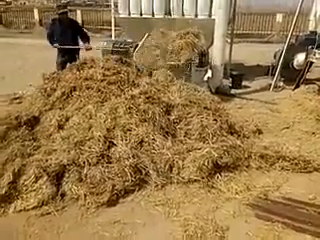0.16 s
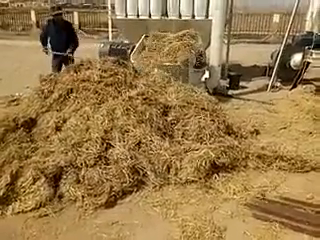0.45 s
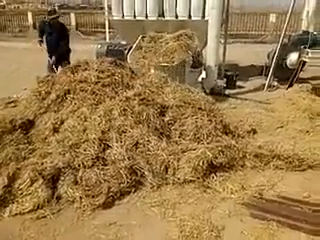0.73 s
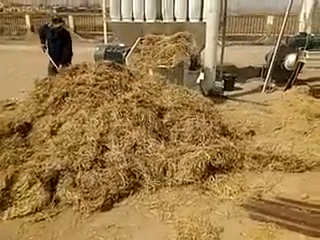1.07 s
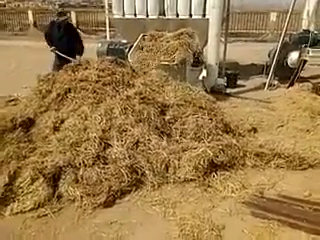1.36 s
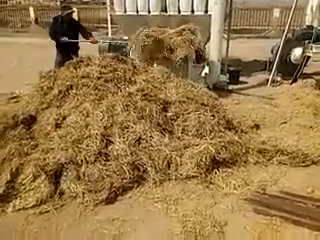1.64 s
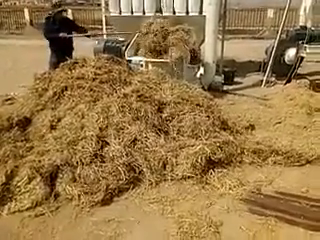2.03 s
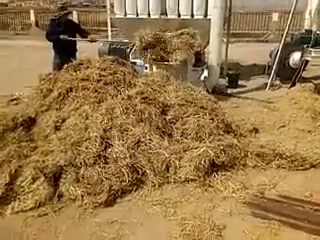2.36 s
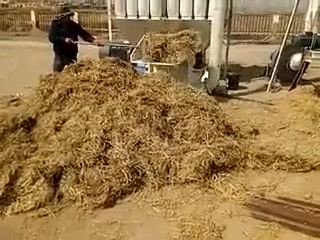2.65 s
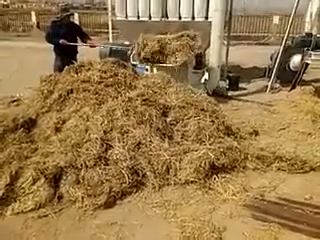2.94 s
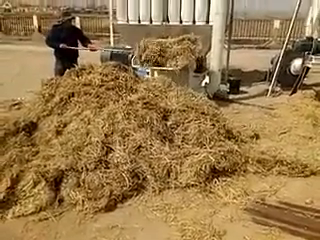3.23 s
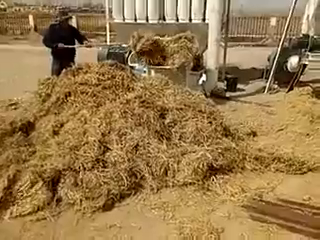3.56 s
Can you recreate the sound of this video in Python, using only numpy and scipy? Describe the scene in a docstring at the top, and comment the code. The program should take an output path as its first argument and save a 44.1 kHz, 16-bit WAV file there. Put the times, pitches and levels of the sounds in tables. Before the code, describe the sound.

A hammer mill roars without pause as it shreds straw in an open yard: rough chip noise, rotor hum, whine, throbbing casing booms and metallic rattle, with low wind thumps on a slightly dull microphone.

```python
"""A hammer mill shreds straw in an open yard, all through: rotor tones, a motor whine, chip roar, rattle, ringing.
First, wind thumps the microphone: shaped low noise, and short swells of narrow noise on top.
For the first two seconds the casing drum booms in its strongest throbs, a wavering narrow band of noise.
Just after 2 s a hard bit ticks on the screen, two short sines; the throbs then come softer.
From about 3 s the wind thumps return, and the shaft hum swells before the end."""
import sys
import numpy as np
from scipy import signal
from scipy.fft import rfft, irfft, next_fast_len
from scipy.io import wavfile
from scipy.ndimage import uniform_filter1d, map_coordinates

SR = 44100
rng = np.random.default_rng(int(sys.argv[2]) if len(sys.argv) > 2 else 0)


def makeup_ratio(level_db):
    """Linear amplitude ratio for a level in decibels (20 dB per factor of ten)."""
    decades = np.asarray(level_db, float) / 20
    return 10 ** decades


def materialize(psi):
    """Save the field psi as 16-bit PCM at rate SR to the path in sys.argv[1].

    A 1-D psi becomes a single channel; in a 2-D psi each row is a channel.
    """
    bounded = np.clip(np.atleast_2d(psi).T, -1, 1)
    quanta = np.round(bounded * 32767).astype(np.int16)
    wavfile.write(sys.argv[1], SR, quanta)


N = 162729  # samples


def unit(x):
    """Scale to rms 1."""
    return x / np.sqrt(np.mean(x ** 2) + 1e-20)


def along(points, hz):
    """Read (f/Hz, value) points on a log frequency axis."""
    f, v = np.transpose(points)
    return np.interp(np.log(hz + 1), np.log(f + 1), v)


def curves(rows):
    """One value per sample for each column after the time."""
    s, *cols = np.transpose(rows)
    return [np.interp(np.arange(N) / SR, s, c) for c in cols]


def wobble(rate):
    """A smooth random curve, rate knots a second."""
    knots = rng.standard_normal(int(N * rate / SR) + 4)
    return map_coordinates(knots, [np.arange(N) * rate / SR])


def filtered(x, response):
    """x with its spectrum multiplied by a response of frequency."""
    m = next_fast_len(N + 8192)
    return irfft(rfft(x, m) * response(np.fft.rfftfreq(m, 1 / SR)), m)[..., :N]


def patchy(patchy_db, size):
    """White noise with patches of random gain, size in (frequency bins, frames)."""
    z = signal.stft(rng.standard_normal(N), nperseg=512)[2]
    field = rng.standard_normal(z.shape)
    field = uniform_filter1d(field, size[0], 0)
    field = uniform_filter1d(field, size[1], 1)
    return unit(signal.istft(z * makeup_ratio(patchy_db * unit(field)), nperseg=512)[1][:N])


def sway(width_hz, even=0.32):
    """Complex low-passed noise, its size partly evened: times a carrier it makes a narrow band."""
    a, b = filtered(rng.standard_normal((2, N)), lambda f: 1 / (1 + (2 * f / width_hz) ** 2))
    z = (a + 1j * b) / (np.hypot(a, b) + 1e-9) ** even
    return z / np.sqrt(np.mean(np.abs(z) ** 2) / 2)  # real part has rms 1


def tone(phase, drift):
    """A sine of rms 1 with a drifting phase (drift in radians)."""
    return np.sqrt(2) * np.sin(phase + drift * wobble(14) + rng.uniform(0, 2 * np.pi))


def swells(rows, width_hz, even):
    """Narrow bands of noise that swell and fade, cut from one shared noise at different places."""
    t, shared, out = np.arange(N) / SR, sway(width_hz, even), np.zeros(N)
    for k, (s, length, hz, db) in enumerate(rows):
        swell = np.exp(-(2 * (t - s) / length) ** 2)
        band = np.real(np.roll(shared, 6007 * k) * np.exp(2j * np.pi * hz * t))
        out += makeup_ratio(db) * swell * band
    return out


# The row-passing tone, six rows of hammers per turn: t/s, level/dB rms
ROW_PASSING = [(0, -41), (.3, -31.5), (.7, -31), (1.0, -36.5), (1.42, -34), (1.64, -41), (1.78, -31.5),
               (1.95, -40.5), (2.2, -32), (2.7, -38), (2.92, -30), (3.1, -39.5), (3.19, -28.5), (3.32, -35),
               (3.69, -31.5)]
# Twice the row-passing rate, flaring and sinking: t/s, peak level of the line/dB
TWICE_PASSING = [(0.0, -46), (.45, -41), (.62, -44), (1.0, -39), (1.3, -44), (1.48, -39), (1.63, -45),
                 (1.82, -40), (1.87, -62), (1.98, -36), (2.28, -43), (2.33, -51), (3.69, -49)]
# Three times the row-passing rate: t/s, peak level of the line/dB
THRICE_PASSING = [(0.0, -61), (0.09, -35), (0.25, -47), (0.29, -37.5), (0.6, -54), (0.71, -28.5),
                  (0.82, -44.5), (0.88, -28.5), (1.0, -49), (1.3, -32.5), (1.38, -58), (1.49, -32),
                  (1.58, -37.5), (1.76, -45), (1.84, -36), (1.96, -42), (2.02, -30), (2.1, -46),
                  (3.13, -39.5), (3.23, -51), (3.37, -28), (3.56, -45), (3.69, -41)]
# Hum of the shaft at one cycle a turn: t/s, level/dB rms
SHAFT_HUM = [(0.0, -50), (0.19, -49), (0.98, -39), (2.14, -58), (3.47, -33), (3.69, -48)]
# Rotor orders that hold their level: multiple of the turning rate, level/dB rms, waver/dB
STEADY_ORDERS = [(3, -43, 1.5), (42, -45.5, 2.5)]
# Motor whine: f/Hz, level/dB rms
MOTOR_WHINE = [(1736, -50), (2347, -45.5), (3129, -73)]


def rotor():
    """The hammer rotor sings at multiples of its turning rate; the motor whines at fixed pitches."""
    t = np.arange(N) / SR
    turn = 2 * np.pi * 49.93 * t  # turns at 49.93 Hz

    def rough(order):
        """A line in a skirt of noise 28 Hz wide."""
        return np.real((1 + sway(28)) * np.exp(1j * order * turn))

    out = makeup_ratio(curves(ROW_PASSING)[0] + 2.0 * wobble(14)) * tone(6 * turn, drift=1.05)
    out += makeup_ratio(curves(TWICE_PASSING)[0] + 1.3 * wobble(22.24)) * rough(12)
    out += makeup_ratio(curves(THRICE_PASSING)[0] + 0.87 * wobble(22.05)) * rough(18)
    out += makeup_ratio(curves(SHAFT_HUM)[0]) * tone(turn, drift=0.43)
    for order, db, waver_db in STEADY_ORDERS:
        out += makeup_ratio(db + waver_db * wobble(12)) * tone(order * turn, drift=0.66)
    for hz, db in MOTOR_WHINE:
        out += makeup_ratio(db + 0.61 * wobble(0.86)) * tone(2 * np.pi * hz * t, drift=0.32)
    return out


# Shredding as it reaches the microphone: t/s, rms level of its 1000-2300 Hz band/dB
SHREDDING_LEVEL = [(0.0, -31.5), (2.0, -32), (3.69, -32)]
# Colour the casing gives the roar: f/Hz, relative level/dB
CASING_COLOUR = [(120, -120), (170, -0.5), (300, 9), (400, 1.5), (480, -1.5), (700, -3), (820, 3),
                 (1000, -0.5), (1300, -1.5), (1600, -6), (1830, 3), (2150, 2), (2280, -6.5), (2600, 3.5),
                 (3000, -2), (3600, -3), (4200, -6), (4800, -3.5), (5100, -1), (5350, -0.5), (6050, -1.5),
                 (6230, -2.5), (6400, -6.5), (6800, -13), (7300, -16.5), (7700, -27.5), (8200, -53),
                 (9000, -120)]


def shredding():
    """Air rush and a hail of straw chips, single clicks of random size, through the casing's colour."""
    chips_per_s, chip_spread_db, chip_share = 9000, 4, 0.21  # share of the power
    count = int(chips_per_s * N / SR)
    places = (rng.uniform(size=count) * N).astype(int)
    sizes = makeup_ratio(chip_spread_db * rng.standard_normal(count)) * np.sign(rng.standard_normal(count))
    chips = unit(np.bincount(places, sizes, N))
    rush = patchy(patchy_db=1.9, size=(8, 6))
    drive = np.sqrt(chip_share) * chips + np.sqrt(1 - chip_share) * rush
    roar = filtered(drive, lambda f: makeup_ratio(along(CASING_COLOUR, f)))
    band = unit(filtered(roar, lambda f: (f > 1000) & (f < 2300)))
    scale = np.dot(band, band) / np.dot(band, roar)  # brings that band of the roar to rms 1
    return scale * roar * makeup_ratio(curves(SHREDDING_LEVEL)[0] + 0.73 * wobble(8.72))


# Throbs of the casing drum: t/s, level/dB rms, centre f/Hz
DRUM_THROBS = [(0.0, -29.5, 255), (0.11, -25.5, 250), (0.55, -34, 250), (0.78, -20, 250),
               (0.87, -32.5, 225), (1.03, -17, 240), (1.12, -23.5, 270), (1.18, -34.5, 260),
               (1.42, -18.5, 235), (1.58, -33.5, 250), (1.65, -24, 230), (1.69, -32.5, 240),
               (1.83, -19, 240), (1.92, -28, 225), (2.12, -28, 260), (2.5, -28, 260), (2.64, -32.5, 250),
               (2.79, -22, 238), (3.02, -27.5, 250), (3.21, -20, 265), (3.36, -33.5, 255),
               (3.61, -19.5, 240), (3.69, -24, 230)]


def drum():
    """The casing booms in throbs, a narrow growl whose centre wavers."""
    db, hz = curves(DRUM_THROBS)
    phase = 2 * np.pi * np.cumsum(hz + 8 * wobble(20)) / SR
    return makeup_ratio(db) * np.real(sway(57.7, even=0.29) * np.exp(1j * phase))


# High ringing swells of hammers and screen, and clumps rattling down the chute near 2580 Hz:
# centre t/s, length/s, f/Hz, crest level/dB rms
RING_AND_CLUMP_SWELLS = [(.1, 0.33, 5080, -32.5), (.33, 0.18, 5760, -29.5), (.35, 0.11, 5490, -28),
                         (.5, 0.1, 5210, -31.5), (.67, 0.11, 5490, -31), (.88, 0.092, 5440, -32.5),
                         (1.03, 0.19, 5180, -31.5), (1.07, 0.068, 5870, -32), (1.55, 0.63, 5730, -32),
                         (1.77, 0.14, 5720, -29), (2.36, 0.053, 5730, -32), (2.38, 0.11, 5120, -35),
                         (2.72, 0.13, 5420, -29), (2.72, 0.068, 5105, -33), (2.93, 0.15, 5000, -28.5),
                         (3.03, 0.1, 6030, -29), (3.1, 0.18, 5340, -36), (3.48, 0.076, 5030, -27.5),
                         (3.62, 0.11, 4990, -34.5), (2.09, 0.09, 2584, -25.5), (2.28, 0.11, 2580, -34),
                         (3.0, 0.12, 2580, -29), (1.95, 0.073, 2100, -29)]
# The metal of hammers and screen ringing faintly all the time: f/Hz, width/Hz, level/dB rms
FAINT_RINGING = [(5120, 320, -38.5), (5730, 59, -39)]
# A hard bit strikes the screen: t/s, level before the rise and the partials/dB
SCREEN_TICKS = [(2.0414, -6)]
# What the struck screen rings with: f/Hz, relative level/dB
SCREEN_PARTIALS = [(4900, 0), (4100, -3)]


def rings_and_clumps():
    """Narrow noise swells for ringing metal and chute clumps, a faint ringing bed, a fast-dying tick."""
    t = np.arange(N) / SR
    out = swells(RING_AND_CLUMP_SWELLS, width_hz=85, even=0.1)
    for hz, width_hz, db in FAINT_RINGING:
        band = np.real(sway(width_hz) * np.exp(2j * np.pi * hz * t))
        out += makeup_ratio(db + 1.4 * wobble(6.46)) * band
    t60_s, rise_s = 0.0045, 0.0002
    for s, db in SCREEN_TICKS:
        u = np.maximum(t - s, 0)
        envelope = makeup_ratio(db - 60 * u / t60_s) * (1 - np.exp(-u / rise_s))
        out += envelope * sum(makeup_ratio(level) * np.sin(2 * np.pi * hz * u) for hz, level in SCREEN_PARTIALS)
    return out


# Rattle in the chute: t/s, level/dB rms, centre f/Hz
CHUTE_RATTLE = [(0.0, -37, 2573), (0.6, -31.5, 2760), (0.86, -27, 2690), (1.1, -31, 2690),
                (1.97, -35.5, 2676), (2.08, -30, 2585), (2.15, -38, 2650), (2.25, -29.5, 2650),
                (2.37, -36.5, 2650), (2.49, -30, 2660), (2.58, -40, 2690), (2.97, -31.5, 2646),
                (3.35, -32.5, 2700), (3.45, -43, 2698), (3.69, -32.5, 2676)]


def chute():
    """A broad rattle whose centre wanders, noise around a gliding carrier."""
    db, hz = curves(CHUTE_RATTLE)
    carrier = np.exp(2j * np.pi * np.cumsum(hz) / SR)
    return makeup_ratio(db + 2.4 * wobble(24.96)) * np.real(sway(410) * carrier)


# Wind thumps on the microphone: centre t/s, length/s, f/Hz, crest level/dB rms
WIND_THUMPS = [(.26, 0.068, 105, -27), (.27, 0.13, 148.4, -26.5), (.71, 0.042, 98, -25.5),
               (3.15, 0.038, 95, -29.5), (3.22, 0.1, 149.4, -27), (3.2, 0.064, 363, -35.5),
               (3.44, 0.066, 92, -24.5)]


def wind_thumps():
    """Wind thumps on the microphone, short low swells of narrow noise."""
    return swells(WIND_THUMPS, width_hz=19, even=0.49)


# Wind rumble on the microphone: t/s, level/dB rms
WIND_LEVEL = [(0.0, -50), (0.26, -36.5), (0.64, -37), (0.87, -41), (0.99, -30.5), (1.19, -42),
              (1.28, -31.5), (1.35, -43), (1.48, -30.5), (1.52, -40), (2.9, -40), (3.13, -30.5),
              (3.69, -30)]
# Colour of the wind rumble: f/Hz, relative level/dB
WIND_COLOUR = [(12, -40), (22, -6), (38, -12), (62, -2.5), (97, 1), (125, -5), (155, -1), (190, -5),
               (300, -24), (450, -21), (600, -120)]


def wind():
    """Lumpy low rumble on the microphone, coloured noise with a wavering level."""
    noise = filtered(rng.standard_normal(N), lambda f: makeup_ratio(along(WIND_COLOUR, f)))
    lumps = makeup_ratio(2.4 * wobble(18)) * noise
    return makeup_ratio(curves(WIND_LEVEL)[0]) * unit(lumps)


# Faint top hiss: t/s, level/dB rms
HISS_LEVEL = [(0.0, -60.5), (2.59, -66), (2.96, -60), (3.65, -63)]


def top_hiss():
    """Patchy noise from about 7450 Hz up to 13950 Hz, above the microphone's range."""
    noise = patchy(patchy_db=5.0, size=(3, 5))
    hiss = unit(filtered(noise, lambda f: (f < 13950) / (1 + (7450 / (f + 1)) ** 24)))
    return makeup_ratio(curves(HISS_LEVEL)[0]) * hiss


def scene():
    """Everything in the yard, one channel."""
    mill = rotor() + shredding() + drum() + rings_and_clumps() + chute()
    return (mill + wind_thumps() + wind())[None]


def low_pass(x):
    """Removes everything above the highest recorded frequency."""
    return signal.sosfilt(signal.butter(12, 13950, fs=SR, output="sos"), x)


def record(dry):
    """The microphone falls to half amplitude at 7500 Hz, steeply; a faint hiss lies above."""
    heard = filtered(dry, lambda f: 1 / (1 + (f / 7500) ** 12))
    mix = heard + top_hiss()
    return low_pass(mix)


dry = scene()
out = record(dry)
materialize(out)
```